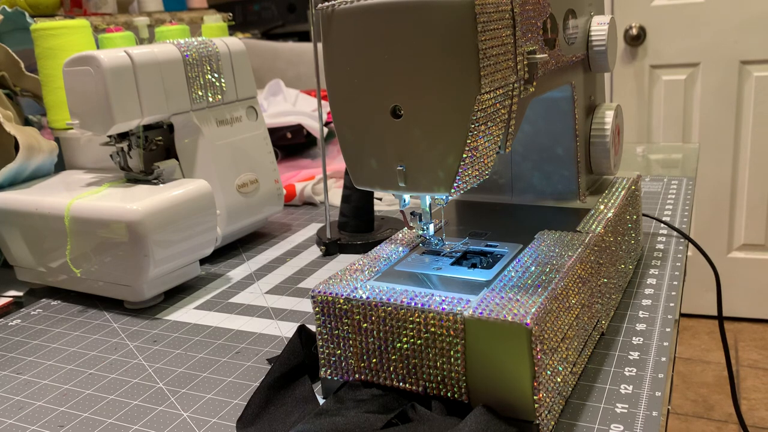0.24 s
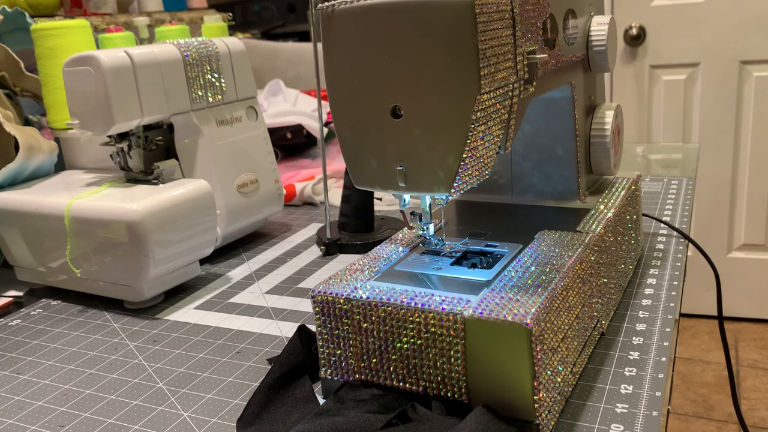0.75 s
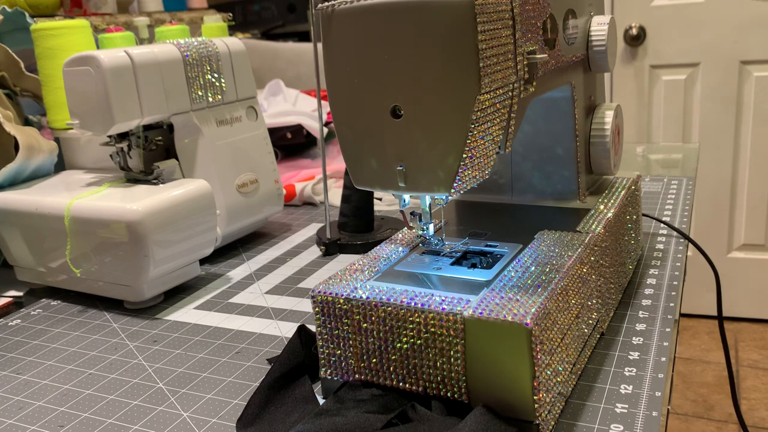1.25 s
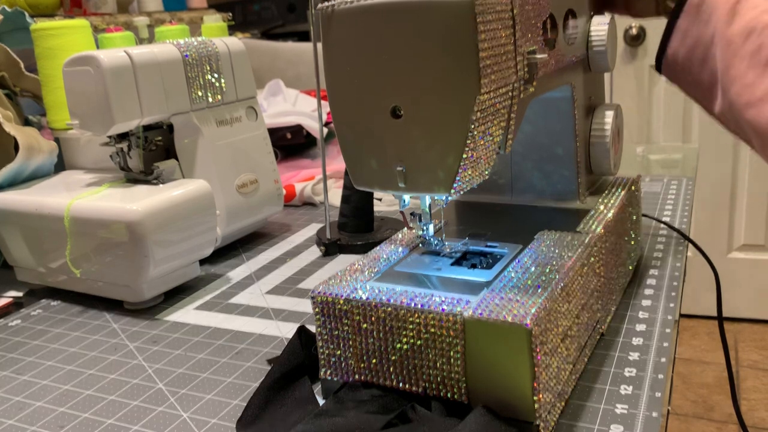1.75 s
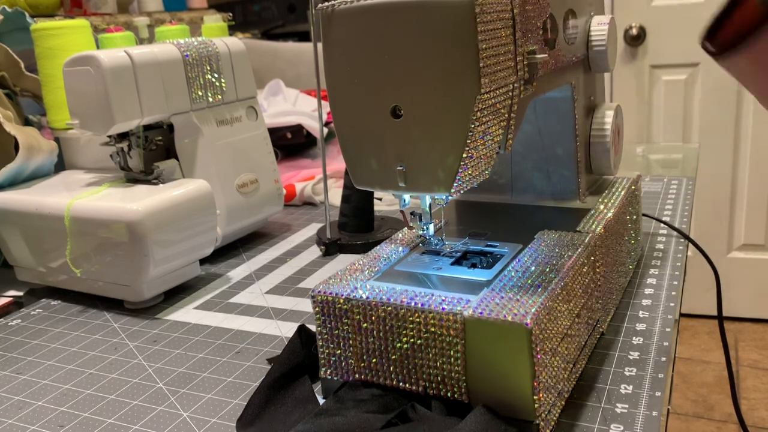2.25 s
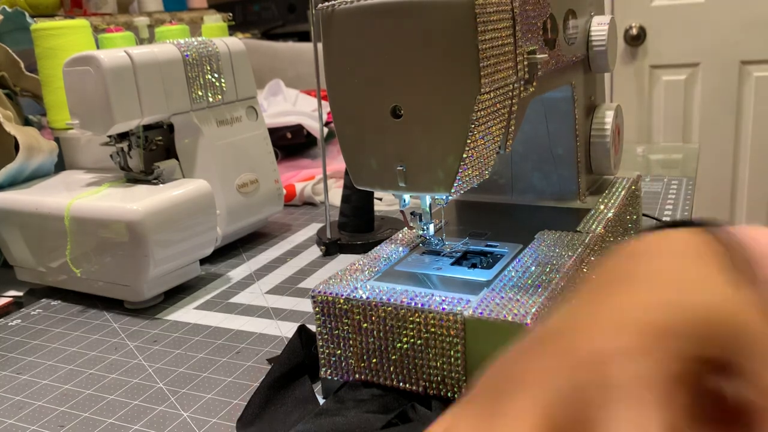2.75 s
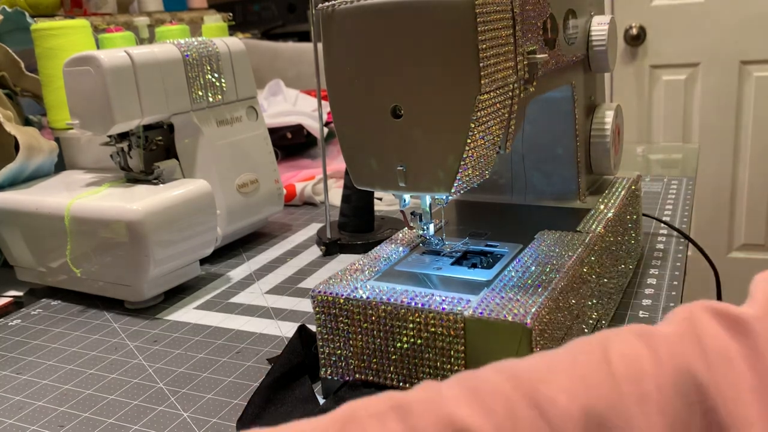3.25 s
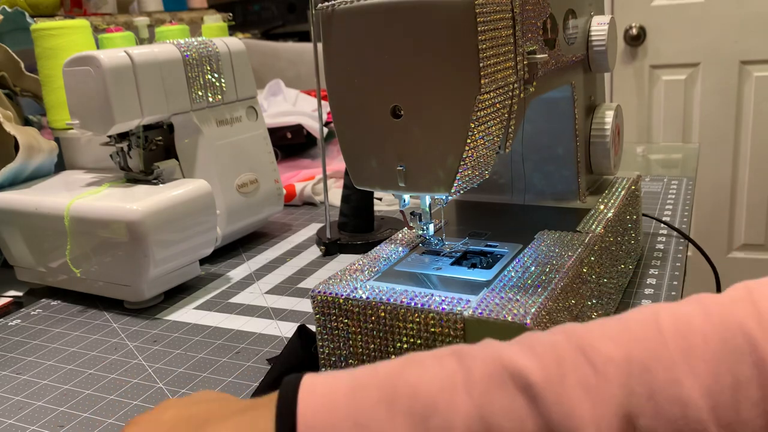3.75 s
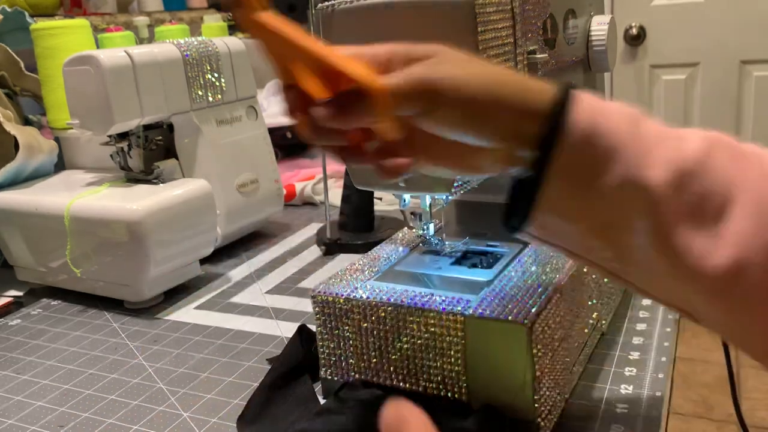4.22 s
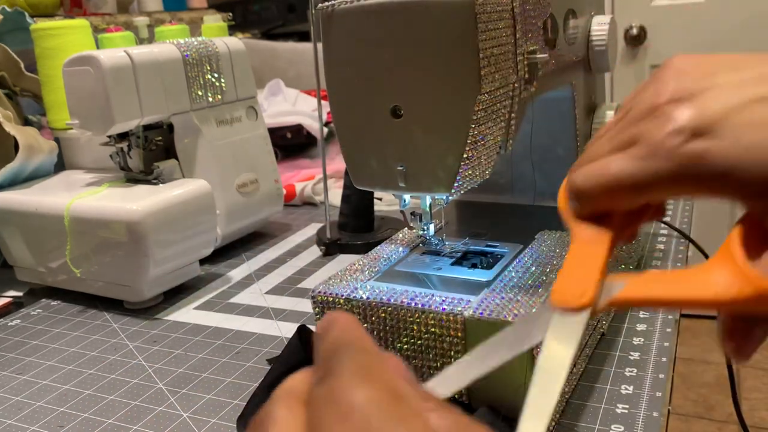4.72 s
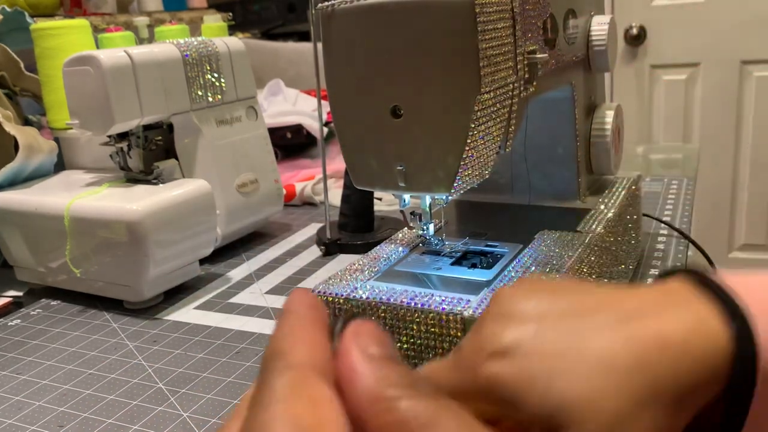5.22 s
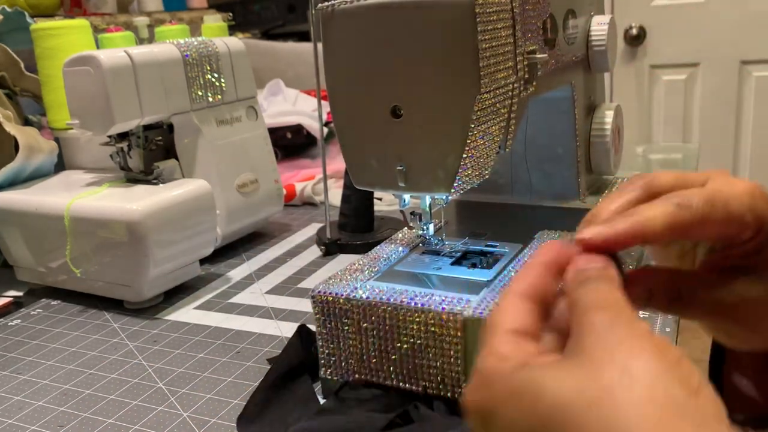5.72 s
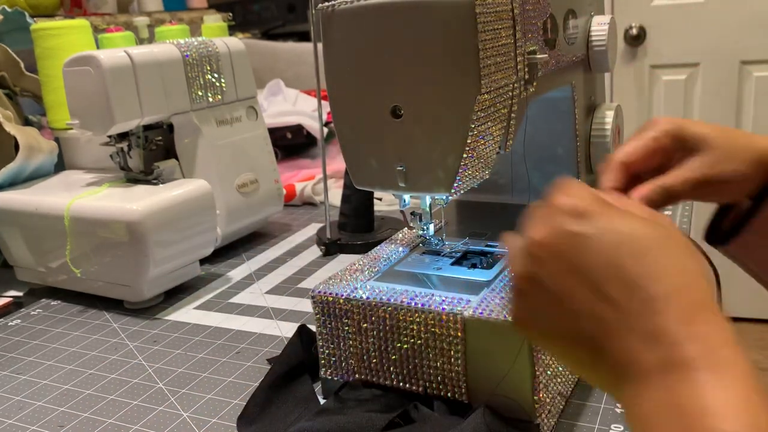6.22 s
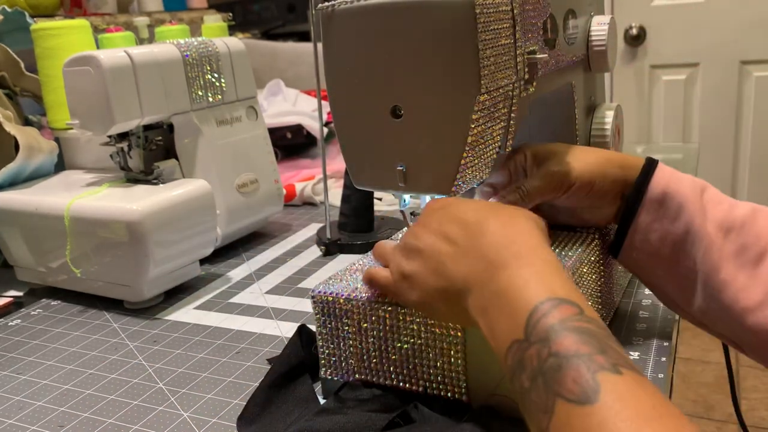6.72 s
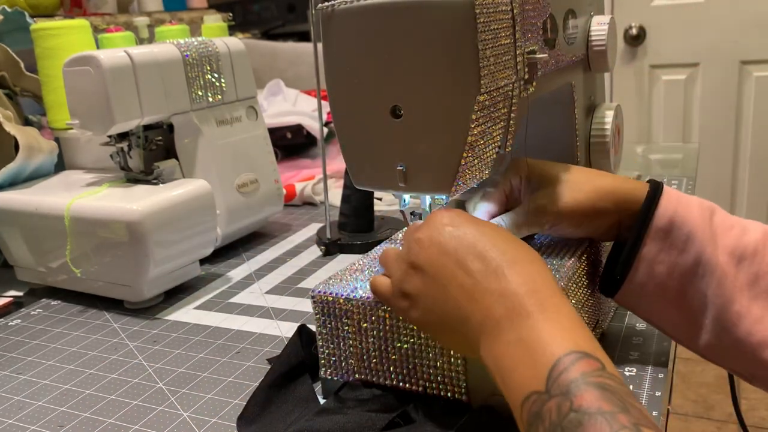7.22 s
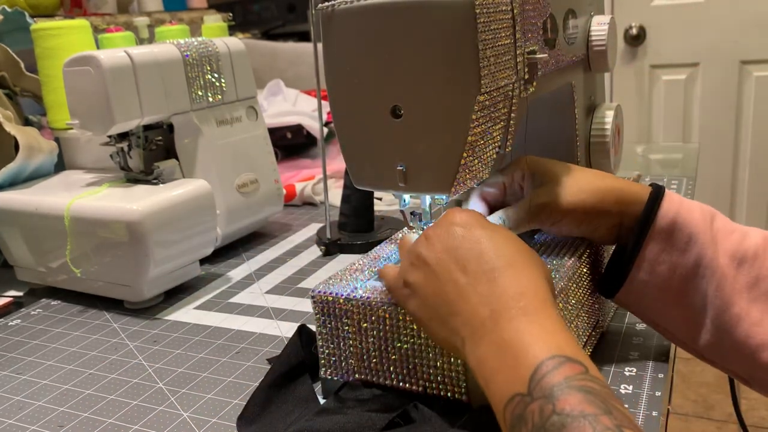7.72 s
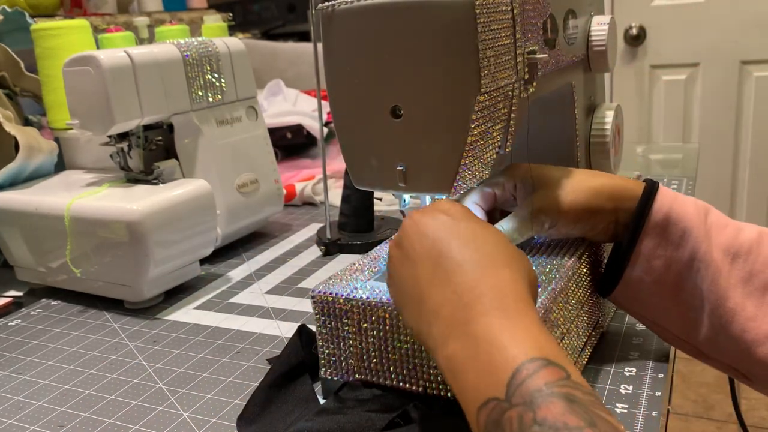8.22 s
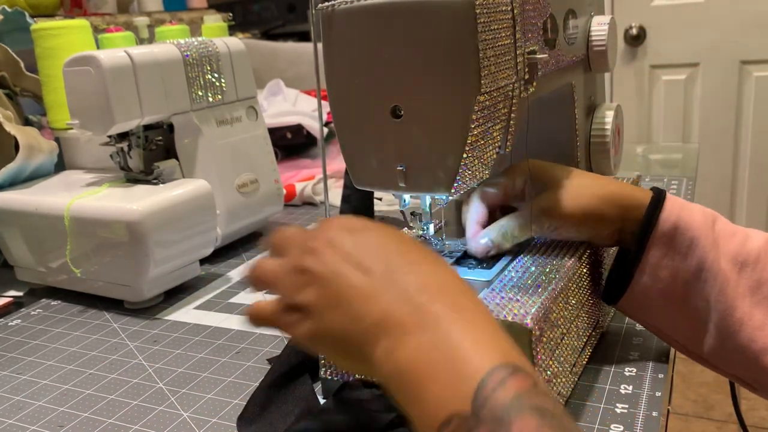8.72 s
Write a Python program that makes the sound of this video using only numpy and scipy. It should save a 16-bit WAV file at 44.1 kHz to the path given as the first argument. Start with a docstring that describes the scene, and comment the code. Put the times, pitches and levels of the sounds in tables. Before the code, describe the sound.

Falling motor whirr coasts to silence, a sharp mechanical snap, scissors knocking on a table, gritty snips, a bouncing drop, then light fiddly clicks.

```python
"""Sewing machine and scissors on a work table

In a quiet furnished room a home sewing machine coasts to a stop after winding a bobbin (gliding tones and
whirr), and the winder is snapped back (cracks with ringing modes). Scissors are picked up, snip the thread
(gritty noise) and are dropped, bouncing; fingers seat the bobbin with small clicks amid rustling noise.
A phone with two microphones stands close by; under it all lie a low hum and hiss."""
import sys
import numpy as np
from scipy import signal
from scipy.fft import rfft, irfft, next_fast_len
from scipy.io import wavfile
from scipy.ndimage import uniform_filter1d

SR = 44100
rng = np.random.default_rng(int(sys.argv[2]) if len(sys.argv) > 2 else 0)


def ratio_of_db(decibels):
    """Turn decibels (scalar or array-like) into linear amplitude factors; 0 dB maps to 1."""
    return 10 ** (np.asarray(decibels, float) / 20)


def log_audio(samples):
    """Write samples as a 16-bit WAV file to the path given in sys.argv[1]."""
    # one column per channel
    frames = np.atleast_2d(samples).T
    # limit to full scale, then quantise
    limited = np.clip(frames, -1, 1)
    pcm = np.round(limited * 32767).astype(np.int16)
    wavfile.write(sys.argv[1], SR, pcm)


N = 395117
T = np.arange(N) / SR

# motor coasting down: [t/s, slot-passing rate f/Hz, bearing and belt noise level/dB before a 1 dB cut]
COAST = [(0.0, 2008, -33), (0.2, 1610, -33), (0.41, 1239, -34), (0.65, 829, -37), (0.822, 581.3, -38.5),
         (0.984, 351.5, -39), (1.1, 245, -47), (1.168, 185.7, -54), (1.234, 133, -66), (1.32, 58.9, -80)]
# mount resonances met by the slot whine: [f/Hz, width/Hz, peak level/dB]
WHINE_MOUNT = [(275, 50, -47), (420, 50, -33), (652, 45, -38), (829, 70, -30), (1040, 110, -40),
               (1400, 150, -58), (1830, 105, -27), (1980, 100, -30)]
# mount resonances met by its octave: [f/Hz, width/Hz, peak level/dB]
OCTAVE_MOUNT = [(400, 50, -50), (640, 50, -52), (829, 45, -36), (1010, 45, -42), (1850, 110, -43),
                (2790, 160, -39), (3690, 200, -42)]
# mount resonances met by the belt tone: [f/Hz, width/Hz, peak level/dB]
BELT_MOUNT = [(1010, 80, -54), (1300, 110, -39), (1450, 200, -42)]


def motor():
    """Tones of the turning armature swell as they cross resonances, over a whirr that dulls as it slows."""
    hz, whirr_db = curve(COAST)
    running = T < COAST[-1][0]
    phase = 2 * np.pi * np.cumsum(hz * (1 + 0.006 * walk(60))) / SR
    speed = hz / COAST[0][1]
    # reflections shift the phase between the microphones as the pitch falls
    turn = hz / 2100.0 * np.array([[1], [-1]])

    between_db = -68  # whine between the resonances
    whine = ratio_of_db(between_db) * speed + peaks(hz, WHINE_MOUNT)
    octave = peaks(2 * hz, OCTAVE_MOUNT)
    tones = ratio_of_db(3.2 * walk(70)) * whine * np.sin(phase + turn)
    tones += ratio_of_db(3 * walk(80)) * octave * np.sin(2 * phase + turn)
    tones *= np.sqrt(2) * ratio_of_db(np.minimum(whirr_db + 39, 0))

    belt_multiple = .8  # of the slot rate
    belt = peaks(belt_multiple * hz, BELT_MOUNT)
    tones += np.sqrt(2) * ratio_of_db(3 * walk(70)) * belt * np.sin(belt_multiple * phase + turn)

    # the table's 90 Hz mode is shaken as the slot rate passes 760 Hz
    tones += peaks(hz, [(760, 380, -42)]) * band(80, 100, .25)
    tones += locked_tones(hz, phase, speed, turn)
    return running * (tones + ratio_of_db(whirr_db - 1.0) * whirr(phase, speed))


# further tones locked to the motor: [multiple of the slot rate, level/dB before flutter, speed and casing]
ORDERS = [(.11, -45), (.4, -54.5), (.6, -54), (1.2, -53), (1.6, -53), (1.8, -56), (2.2, -57), (2.4, -55),
          (2.55, -54), (2.8, -57), (3, -46), (3.2, -57), (3.6, -58), (4, -48), (4.4, -58), (4.8, -57),
          (5, -54), (5.6, -59), (6, -56), (7, -58), (8, -60)]


def locked_tones(hz, phase, speed, turn):
    """Brushes and belt never run true: each multiple of the slot rate flutters in size and phase."""
    tones = 0
    for k, db in ORDERS:
        flutter = ratio_of_db(5.5 * walk(40))
        wobble = 1.1 * walk(90)
        size = ratio_of_db(db) * flutter * speed ** 1.05 * casing(k * hz)
        tones = tones + size * np.sin(k * phase + wobble + min(k, 1) * turn)
    return tones


# bearing and belt noise, before the casing colours it: [f/Hz, relative level/dB]
WHIRR_COLOUR = [(40, -27), (70, -13), (480, -10), (600, -8), (1600, -18.5), (2200, -13), (5000, -22),
                (10500, -22), (14000, -23), (16000, -50)]


def whirr(phase, speed):
    """Noise coloured by the casing throbs once a shaft turn and loses its treble as the motor slows."""
    shaft_multiple, throb_depth = .11, .5  # multiple of the slot rate; depth at full speed
    hz = np.geomspace(50, 12000, num=400)
    casing_colour = np.c_[hz, 8.0 * np.log10(casing(hz))]
    bright = unit(colour(colour(noise(0.6), WHIRR_COLOUR), casing_colour))
    bright = bright * (1 + throb_depth * speed * np.cos(shaft_multiple * phase)) * ratio_of_db(1.2 * walk(150))
    dull = colour(bright, [(400, -6.5), (8000, -20.5)])
    share = np.clip(speed, 0, 1) ** 1.1
    return share * bright + (1 - share) * dull


# casing resonances that the motor tones sweep through: [f/Hz, width/Hz, peak level/dB]
CASING_PEAKS = [(88, 14, 11), (270, 37.5, -3), (400.6, 37, 15.5), (622, 69, 3.5), (826, 61, 14.5),
                (1003, 70, 5), (1340, 130, -2), (1850, 250, 5), (2750, 110, 8.5), (3140, 230, 10),
                (3803, 300, 3), (4288, 400, 4.5), (4864, 100, 1.5), (5702, 150, -2.5), (6500, 1300, -1.5),
                (9500, 1700, 1.5)]


def casing(hz):
    """Gain of the casing: resonances over a small even floor."""
    return 0.15 + peaks(hz, CASING_PEAKS)


# ringing of the machine, body below 1400 Hz and small parts above: [f/Hz, relative level/dB, t60/s]
MACHINE_MODES = [(269, -14, .13), (385, -4, .1), (590, -9, .06), (760, 0, .1), (960, -6, .08),
                 (1184, -11, .04), (1450, -5, .04), (1980, 0.5, .035), (2300, -3, .035), (2700, 0, .035),
                 (3150, 0, .03), (3650, -2, .025), (4050, -3, .03)]
# blows on the machine: [t/s, crack level/dB, body level/dB, small parts level/dB], before the trims below
MACHINE_HITS = [(1.0859, -41.5, -46, -57), (1.4277, -67, -57, -62), (1.4936, -61, -49, -53.5),
                (1.5974, -61, -63, -54), (1.6338, -39.5, -53, -29), (1.6402, -31, -47, -28),
                (1.6452, -11, -18, -6), (1.6485, -9, -10, -7), (1.933, -42.5, -70, -57),
                (1.9454, -46.5, -44.5, -53), (1.9775, -40, -40, -42), (1.9865, -32, -36, -33),
                (1.9948, -38, -33, -33), (2.4812, -54, -68, -62), (2.52, -60, -70, -66),
                (2.594, -53, -68, -62), (6.333, -80, -64, -64), (6.6, -76, -66, -66),
                (6.646, -82, -62, -72), (6.8076, -44, -48, -40), (6.8342, -64.5, -41.5, -48),
                (7.1148, -52.5, -37, -45), (7.2092, -80, -47, -68), (7.3053, -52.5, -38, -45.5),
                (7.3315, -36, -34, -32), (7.3702, -44, -42.5, -38.5), (7.5422, -62, -55, -58),
                (7.5577, -55, -52, -50), (7.5711, -42.5, -43, -38.5), (7.5985, -40, -40, -36),
                (7.6038, -27, -29.5, -28), (7.6675, -42.5, -43, -38), (7.6812, -42.5, -31, -46),
                (7.6944, -30.5, -39, -29.5), (7.7074, -39.5, -36.5, -31), (7.8186, -48.5, -44, -46),
                (7.845, -32, -33, -31), (7.8963, -49.5, -48, -45), (7.9817, -64, -42, -56),
                (7.9925, -62.5, -33.5, -41.5), (8.2162, -74, -56, -66), (7.276, -60, -49.5, -55),
                (8.6194, -64, -48, -54), (8.6442, -66, -52, -52), (8.6494, -68, -44, -51),
                (8.722, -72, -60, -60), (8.7514, -68, -60, -55), (8.8069, -55, -51.5, -50)]


def machine():
    """Winder snaps, bobbin clicks and stray finger ticks set the machine ringing after a rough contact."""
    hits = np.r_[MACHINE_HITS, ticks(count=24)]
    return blows(hits, MACHINE_MODES, onset_s=.0015, t60_s=.032, low_hz=290,
                 body_db=0.6, parts_db=1.5, tilt_db=-3)


# ringing of the table, body below 1400 Hz and small parts above: [f/Hz, relative level/dB, t60/s]
TABLE_MODES = [(68, -22, .18), (125, -14, .14), (172, -10, .13), (275, -9, .11), (490, -3, .09),
               (640, -10, .06), (800, 2, .11), (1020, -2, .09), (1150, -3, .08), (1340, -4, .07),
               (1900, -6, .04), (2350, -8, .03), (3100, -5, .03), (3700, -1, .018), (4600, 0.5, .012)]
# blows on the table: [t/s, crack level/dB, body level/dB, small parts level/dB], before the trims below
TABLE_HITS = [(2.9868, -49.5, -42, -64.5), (2.9968, -41.5, -36.5, -43.5), (3.056, -30, -32, -29),
              (3.0712, -48, -27.5, -57), (3.1204, -12.5, -21, -15), (3.1482, -21.5, -18, -18),
              (3.1652, -28, -20.5, -26), (3.2193, -18.5, -39, -30), (3.2264, -21, -24, -27),
              (3.2404, -33.5, -23.5, -28), (3.3437, -36, -62, -55), (3.3618, -35.5, -40, -44),
              (3.384, -23, -32, -25), (3.394, -40, -28, -32), (3.4079, -21, -32.5, -27),
              (3.4214, -29.5, -43.5, -41.5), (3.471, -9, -15, -10.5), (3.4966, -34, -25, -32),
              (3.5395, -39.5, -53, -47), (3.679, -28.5, -20.5, -20), (3.7893, -22.5, -37, -31.5),
              (3.836, -42, -66, -44), (3.857, -46, -72, -47), (3.8712, -46, -72, -48),
              (3.917, -52, -76, -54), (3.9654, -53, -72, -70), (3.9925, -41, -75.5, -68.5),
              (4.0136, -47, -80.5, -72.5), (4.1757, -66, -52, -58), (4.187, -60, -40, -48),
              (4.201, -52.5, -33.5, -50), (4.7028, -57, -80, -56), (5.355, -7, -18.5, -17),
              (5.966, -75, -70, -64), (8.6084, -76, -39, -63)]


def table():
    """Scissors handled, dropped and bouncing strike the table; its modes ring after a short contact."""
    hits = np.r_[TABLE_HITS, bounces(count=11)]
    return blows(hits, TABLE_MODES, onset_s=.0002, t60_s=.014, low_hz=55,
                 body_db=1.5, parts_db=-2.5, tilt_db=3)


# first rebound of the dropped scissors: [t/s, crack level/dB, body level/dB, small parts level/dB]
REBOUND = (5.4081, -17, -29, -26)
# softening per bounce: [crack level/dB, body level/dB, small parts level/dB]
SOFTER = (-2.2, -2.6, -2.4)


def bounces(count):
    """Each flight is shorter than the last, towards a quick rattle, and each landing softer."""
    first_flight_s, shorter, rattle_s = .0305, .64, .008  # rattle_s is added to every flight
    k = np.arange(count)
    flights = first_flight_s * (1 - shorter ** k) / (1 - shorter)
    s = REBOUND[0] + rattle_s * k + flights
    return np.c_[s, REBOUND[1:] + k[:, None] * np.array(SOFTER)]


# lowest modes of the table top, and one faint short high one: [f/Hz, relative level/dB, t60/s]
TABLE_TOP = [(125, -9, .12), (172, 0, .16), (205, -7, .12), (285, -4, .14), (3000, -20, .01)]
# soft knuckle and handle thuds: [t/s, body level/dB]
THUDS = [(2.0, -42), (3.19, -31), (3.212, -31), (3.255, -33), (3.361, -25), (3.4, -30), (3.49, -30),
         (3.58, -39), (3.64, -39), (3.8, -44), (5.37, -31), (5.62, -50), (7.35, -46), (7.69, -41)]


def thuds():
    """Soft knuckles and handles reach little but the table top's lowest modes."""
    treble_db = -40  # crack and small parts against the body
    hits = [(s, db + treble_db, db, db + treble_db) for s, db in THUDS]
    return blows(hits, TABLE_TOP, onset_s=.0002, t60_s=.014, low_hz=55, body_db=0, parts_db=0, tilt_db=0)


def blows(hits, modes, onset_s, t60_s, low_hz, body_db, parts_db, tilt_db):
    """Each blow is a short rough contact: a bright crack, the body's low modes and the ring of small parts."""
    pan_db, pan_scatter_db = -3.5, 4  # left minus right of the cracks
    crack, rings = np.zeros((2, 2, N + 12000))
    t, modes = T[:3000], np.array(modes)
    push = t * np.exp(-t / .00012)
    contact = (1 - np.exp(-t / onset_s)) * ratio_of_db(-60 * t / t60_s)
    small = modes[:, 0] > 1400
    draws = rng.standard_normal((len(hits), 3000 + 9 * len(modes)))
    for (s, crack_level, body_level, parts_level), draw in zip(hits, draws):
        i = int(s * SR)
        chance = draw[3000:].reshape(3, -1)
        force = draw[:3000] * contact
        pan = pan_db + pan_scatter_db * draw[2999]
        crack[:, i:i + 3000] += ratio_of_db(crack_level + np.array([[pan], [-pan]]) / 2) * force
        # the heavy body feels one smooth push, the small parts the rough contact
        body = ring(push, modes[~small], chance[:, np.repeat(~small, 3)], split=.03, spread=0.78)
        parts = ring(force, modes[small], chance[:, np.repeat(small, 3)], split=0.08, spread=0.6)
        rings[:, i:i + body.shape[1]] += ratio_of_db(body_level + body_db) * body
        rings[:, i:i + parts.shape[1]] += ratio_of_db(parts_level + parts_db) * parts
    crack = signal.sosfilt(signal.butter(2, 4200, "high", fs=SR, output="sos"), crack)
    crack = colour(crack, [(5000, -1), (8000, -1), (14000, tilt_db), (16500, -21)])
    # the rings are thinned below low_hz, so the blows stay free of bass
    rings = signal.sosfilt(signal.butter(2, low_hz, "high", fs=SR, output="sos"), rings)
    return (crack + rings)[:, :N]


def ring(force, modes, chance, split, spread):
    """Decaying sines set off by a force; every mode is a close trio, and every blow lands elsewhere."""
    swell_cycles = 2.5  # a mode needs a few of its own cycles to reach full swing, so the lows come late
    hz, db, t60 = np.repeat(modes, 3, axis=0).T
    t = T[:min(int(t60.max() * SR), 8192), None]
    turn = spread * chance[2] * np.array([1, -1])[:, None, None]  # left against right
    size = ratio_of_db(db + 2.5 * chance[0])
    envelope = (1 - np.exp(-t * hz / swell_cycles)) * ratio_of_db(-60 * t / t60)
    split_hz = hz * (1 + split * chance[1])
    each = size * envelope * np.sin(2 * np.pi * split_hz * t + turn)
    sound = signal.fftconvolve(each.sum(axis=2), force[None], axes=1)
    return sound / np.abs(sound).max()


# scissor blades sliding: [t/s at full level, rise/s, hold/s, fall/s, level/dB]
SNIPS = [(4.443, .016, .024, .055, -38), (4.889, .05, .017, .02, -30.5), (5.056, .014, .036, .014, -34),
         (5.215, .06, .02, .04, -66)]
# colour of grinding steel: [f/Hz, relative level/dB]
BLADE_COLOUR = [(400, -19), (1000, -25), (1700, -15), (2600, -17), (3100, -8), (4000, -3), (4700, -8),
                (5400, -4), (6500, -7), (10500, 1), (14000, 0), (16000, -20)]


def snips():
    """Steel edges grind: dense grit with a bright, wide spectrum."""
    gain = 0
    for s, rise, hold, fall, db in SNIPS:
        away = np.maximum((s - T) / rise, (T - s - hold) / fall)
        gain = gain + ratio_of_db(db - 45 * np.maximum(away, 0))
    grit = noise(.3) * ratio_of_db(4.5 * walk(900) + 2.5 * walk(160))
    return gain * unit(colour(grit, BLADE_COLOUR))


# bobbin slipping off its spindle: [t/s, length/s, from f/Hz, to f/Hz, level/dB]
SQUEAK = (1.957, .027, 3500, 7400, -46)


def squeak():
    """A quick rising stick-slip chirp of unsteady level."""
    s, length, from_hz, to_hz, db = SQUEAK
    u = np.clip((T - s) / length, 0, 1)
    phase = 2 * np.pi * np.cumsum(from_hz + (to_hz - from_hz) * u) / SR
    return ratio_of_db(db + 4.0 * walk(370)) * np.sin(np.pi * u) ** .5 * np.sin(phase)


# brief narrow-band sounds: pitched rubs, a knock near 960 Hz, a low table ring near 168 Hz:
# [t/s, length/s, f/Hz, width/Hz, level/dB]
NARROW_SOUNDS = [(.72, 0.037, 1430, 170, -48.5), (1.98, .06, 960, 70, -45), (2.22, 0.12, 2520, 200, -77),
                 (3.334, 0.046, 1800, 180, -45), (3.342, 0.036, 2370, 200, -49),
                 (3.503, 0.062, 1855, 150, -43.5), (4.026, 0.027, 1910, 81, -73),
                 (5.689, .23, 2530, 220, -83), (7.16, 0.08, 1530, 210, -72), (8.134, 0.091, 6020, 200, -81),
                 (8.62, 0.18, 168, 14, -57)]


def narrow_sounds():
    """Each is noise in one narrow band that swells and fades over its length."""
    out = np.zeros((2, N))
    draws = rng.standard_normal((len(NARROW_SOUNDS), SR // 2))
    for (s, length, hz, width, db), grit in zip(NARROW_SOUNDS, draws):
        edges = [hz - width / 2, hz + width / 2]
        narrow = signal.sosfilt(signal.butter(2, edges, "band", fs=SR, output="sos"), grit)
        part = unit(narrow)[-int(length * SR):]
        swell = np.sin(np.pi * np.arange(len(part)) / len(part)) ** .5
        i = int(s * SR)
        out[:, i:i + len(part)] += ratio_of_db(db) * part * swell
    return out


# hands and sleeves on cloth and table; from 1.7 to 2.0 s mostly the dying tail of the big clunk:
# [t/s, dull level/dB, scrape level/dB, bright rustle level/dB], before colouring and grain
HANDS = [(1.2, -82, -88, -82), (1.48, -69, -78, -82), (1.61, -76, -83, -84), (1.7, -48, -52, -62),
         (1.8, -55, -58, -64), (1.93, -61, -66, -69), (2.03, -60, -70, -70), (2.3, -74, -84, -80),
         (2.55, -76, -84, -80), (2.98, -78, -85, -82), (3.18, -48, -54, -52), (3.31, -57, -64, -60),
         (3.42, -48, -53, -49), (3.55, -50, -52, -58), (3.66, -52, -57, -60), (3.82, -64, -72, -70),
         (3.99, -80, -88, -84), (4.165, -82, -90, -84), (4.19, -56, -62, -76), (4.3, -73, -76, -88),
         (4.75, -84, -90, -89), (5.05, -74, -83, -87), (5.36, -80, -86, -84), (5.52, -63, -70, -80),
         (5.74, -80, -88, -87), (5.795, -80, -84, -74), (5.83, -82, -88, -86), (6.1, -88, -93, -89),
         (6.33, -73, -78, -83), (6.5, -71, -76, -81), (6.62, -70, -81, -87), (6.95, -80, -92, -92),
         (7.25, -67, -84, -90), (7.52, -72, -86, -88), (7.7, -61, -71, -74), (8.1, -69, -79, -79),
         (8.55, -73, -82, -87), (8.96, -72, -80, -76)]


def hands():
    """Uneven noise in three bands: dull with the table's modes, a mid scrape and a bright rustle."""
    dull_db, scrape_db, rustle_db = curve(HANDS)
    dull_grain, grit = 2.2 * walk(60), 3.5 * walk(250)
    dull = colour(band(230, 1600, 0.98),
                  [(200, 13), (320, 5), (400, 14), (450, 6), (500, 10), (640, 2), (780, 12),
                   (870, 3), (950, 6), (1080, -4), (1500, -6)])
    scrape = colour(band(1100, 3900, 1.0),
                    [(1300, 1.5), (1600, -1.5), (1850, 5), (2200, 0.1), (2600, 4), (3200, -1.5),
                     (3700, 10), (4100, -1.5)])
    rustle = colour(band(4400, 14500, 1.0), [(5000, 2.82), (8500, 3.8), (12000, 2.1)])
    bright = ratio_of_db(grit) * (ratio_of_db(scrape_db) * scrape + ratio_of_db(rustle_db) * rustle)
    return (T > HANDS[0][0]) * (ratio_of_db(dull_db + dull_grain) * dull + bright)


# ticks above the bright rustle: [crack level/dB, body level/dB, small parts level/dB]
TICK_RISE = (26, 8, 12)


def ticks(count):
    """Faint stray ticks at random times, their strength following the bright rustle."""
    chance = rng.random((count, 2))
    first_s, last_s = HANDS[0][0], HANDS[-1][0] - .1
    s = first_s + chance[:, 0] * (last_s - first_s)
    db = np.interp(s, *np.transpose(HANDS)[[0, 3]]) - 14 * chance[:, 1]
    return np.c_[s, db[:, None] + np.array(TICK_RISE)]


# dull shudder of table and casing: [f/Hz, relative level/dB]
SHUDDER_COLOUR = [(150, -22), (290, -8), (390, 0), (520, -6), (780, 0), (1000, -8), (1400, -24)]
# chatter of loose small parts: [f/Hz, relative level/dB]
CHATTER_COLOUR = [(900, -14), (1200, -3), (1500, -5), (1950, 0), (2300, -5), (2800, -2), (3300, -6),
                  (3750, -2), (5000, -12)]


def aftermath():
    """A dull shudder of table and casing after each blow, and a grainy chatter of small parts."""
    dull = unit(colour(band(120, 1500, .45), SHUDDER_COLOUR))
    chatter = ratio_of_db(3 * walk(300)) * unit(colour(band(900, 5500, .6), CHATTER_COLOUR))
    # column 2 is the blow's body, column 3 its small parts; db is the level against them
    dull_gain = shudder(column=2, db=-11.5, fall_db_s=420)
    chatter_gain = shudder(column=3, db=-26, fall_db_s=210)
    return dull_gain * dull + chatter_gain * chatter


def shudder(column, db, fall_db_s):
    """Things rattle on briefly after the tabled blows and bounces: a decaying gain along time."""
    kicks = np.zeros(N)
    for hit in np.r_[MACHINE_HITS, TABLE_HITS, bounces(count=11)]:
        kicks[int(hit[0] * SR)] = ratio_of_db(hit[column] + db) ** 2
    power = signal.lfilter([1], [1, -ratio_of_db(-fall_db_s / SR) ** 2], kicks)
    return np.sqrt(uniform_filter1d(power, size=300, origin=149) + 1e-18)


# decay of the furnished room: [f/Hz, t60/s]
ROOM_T60 = [(100, 0.2), (1000, 0.22), (3000, 0.24), (12000, 0.33)]


def room(x):
    """Diffuse tail from octave bands of decaying noise, the treble lasting longest."""
    room_db = -16
    t, tail = T[:SR // 2], 0
    table_hz, table_t60 = np.transpose(ROOM_T60)
    for hz in 125 * 2 ** np.arange(7):
        t60 = np.interp(np.log(hz), np.log(table_hz), table_t60)
        octave = signal.butter(2, [hz, 2 * hz], "band", fs=SR, output="sos")
        part = signal.sosfilt(octave, noise(0.98)[:, :len(t)])
        tail = tail + part * ratio_of_db(-60 * t / t60)
    tail = tail * np.clip(t / 0.027, 0, 1)
    tail = tail / np.sqrt(np.sum(tail ** 2) / 2)
    return ratio_of_db(room_db) * signal.fftconvolve(x.mean(axis=0)[None], tail, axes=1)[:, :N]


# the table hums low when shaken or leant on: [t/s, level/dB]
RUMBLE = [(0.0, -55), (0.4, -64), (0.74, -56), (0.86, -54), (1.1, -61), (1.42, -76), (2.25, -60),
          (2.7, -70), (2.9, -56), (3.6, -54), (4.1, -64), (4.5, -70), (5.3, -67), (5.9, -63), (6.1, -71),
          (6.84, -61), (7.76, -54), (8.2, -61), (8.78, -54), (8.96, -65)]
# heavy blows set the hum going: [t/s, level/dB]
THUMPS = [(1.67, -43), (3.19, -48), (4.25, -52), (5.38, -37)]
# colour of the hiss: [f/Hz, relative level/dB]
AIR_COLOUR = [(20, -29), (35, -3), (77, 0), (130, -6), (180, -14), (300, -19), (400, -31), (760, -28),
              (1000, -44), (1700, -41), (5500, -51), (10400, -41), (14500, -44), (16500, -62.5)]


def quiet():
    """Low wavering hum, much alike in both microphones, over the hiss of room and electronics."""
    rise_db_s, fall_db_s, air_db = 500, 110, -63
    hum = band(59, 84, .25)
    thumps = sum(ratio_of_db(db - np.maximum(rise_db_s * (s - T), fall_db_s * (T - s))) for s, db in THUMPS)
    hiss = unit(colour(noise(0.78), AIR_COLOUR))
    return (ratio_of_db(curve(RUMBLE)[0]) + thumps) * hum + ratio_of_db(air_db) * hiss


def noise(apart):
    """Stereo noise: a shared part plus each side's own, which is weaker in the treble."""
    own = rng.standard_normal((3, N))
    return own[0] + apart * colour(own[1:], [(3500, 5), (9000, -8)])


def band(lo_hz, hi_hz, apart):
    """Steep band of noise, rms 1."""
    steep = signal.butter(3, [lo_hz, hi_hz], "band", fs=SR, output="sos")
    return unit(signal.sosfilt(steep, noise(apart)))


def colour(x, points):
    """Shape a sound by (Hz, dB) points joined on a log axis."""
    hz, db = np.transpose(points)
    size = next_fast_len(x.shape[-1])
    bins_hz = np.arange(size // 2 + 1) * SR / size
    gain = ratio_of_db(np.interp(np.log(bins_hz + 1), np.log(hz), db))
    return irfft(rfft(x, size) * gain, size)[..., :x.shape[-1]]


def unit(x):
    """Scale to rms 1."""
    return x / np.sqrt(np.mean(x ** 2))


def peaks(hz, table):
    """Summed gain of resonances."""
    return sum(ratio_of_db(db) / (1 + (2 * (hz - f) / width) ** 2) for f, width, db in table)


def curve(table):
    """Columns of a table along time."""
    s, *columns = np.transpose(table)
    return [np.interp(T, s, c) for c in columns]


def walk(rate):
    """Random levels held 1 / rate s and slewed twice; spread near 1."""
    k = int(SR / rate)
    steps = np.repeat(rng.standard_normal(N // k + 1), k)
    return 1.2 * uniform_filter1d(uniform_filter1d(steps, k), k)[:N]


def scene():
    """All sources, their room sound and the quiet background."""
    near = motor() + machine() + table() + thuds() + squeak() + narrow_sounds()
    cuts = snips()
    cuts_room_db = -4  # the scissors cut close to the phone, so less of the room is heard
    return near + cuts + room(near + ratio_of_db(cuts_room_db) * cuts) + aftermath() + hands() + quiet()


# the two microphone ports agree in the low and middle range, then drift apart:
# [f/Hz, turns that left trails right]
PORT_TURNS = [(0, 0), (7300, 0), (8800, .5), (11100, 1.46), (12400, 1.54), (14600, 2.46), (17000, 2.54)]


def ports(x):
    """Turn the left channel's phase against the right."""
    size = next_fast_len(N)
    turns = np.interp(np.arange(size // 2 + 1) * SR / size, *np.transpose(PORT_TURNS))
    left = irfft(rfft(x[0], size) * np.exp(-2j * np.pi * turns), size)[:N]
    return np.array([left, x[1]])


def roll_off(x):
    """The treble ends steeply here."""
    return signal.sosfilt(signal.butter(12, 17160, fs=SR, output="sos"), x)


def record(dry):
    """The phone's two ports part in phase in the treble, and the deepest bass is cut."""
    bass_cut = signal.butter(4, 42, "high", fs=SR, output="sos")
    mix = signal.sosfilt(bass_cut, ports(dry))
    return roll_off(mix)


dry = scene()
out = record(dry)
log_audio(out)
```